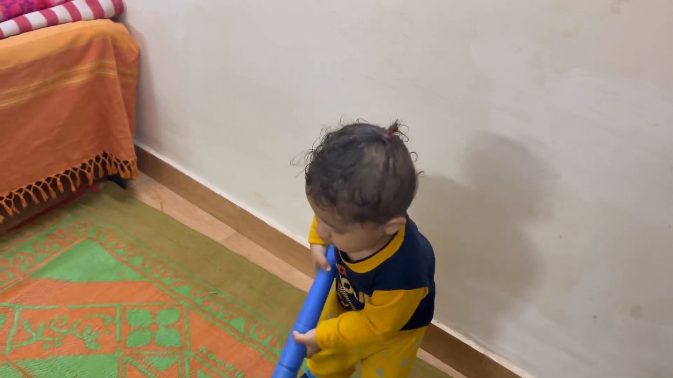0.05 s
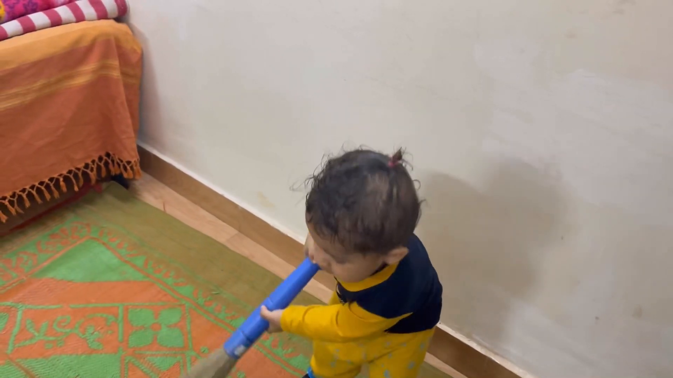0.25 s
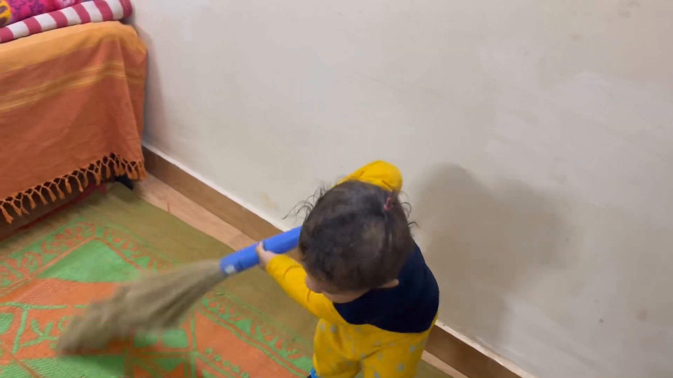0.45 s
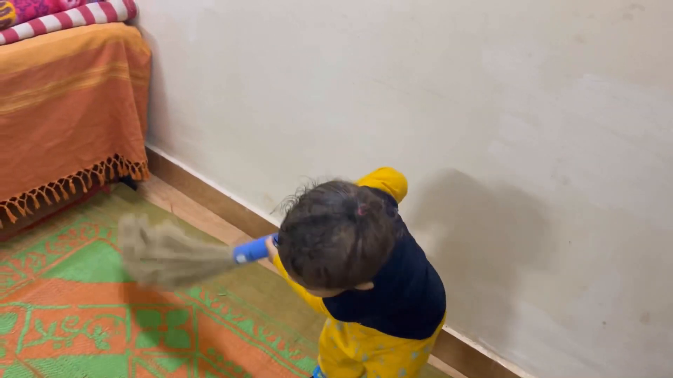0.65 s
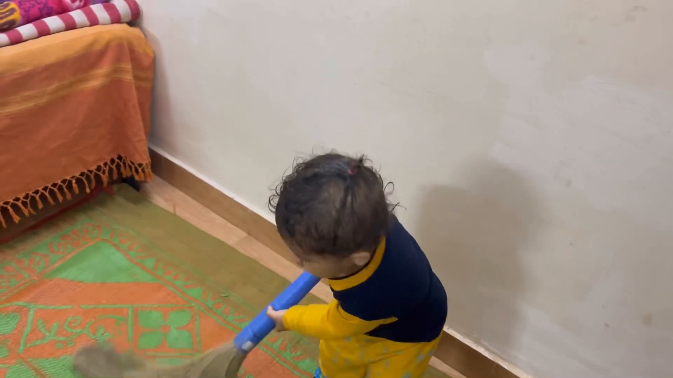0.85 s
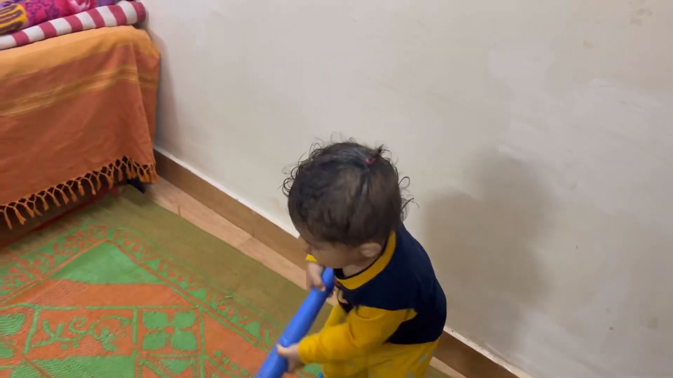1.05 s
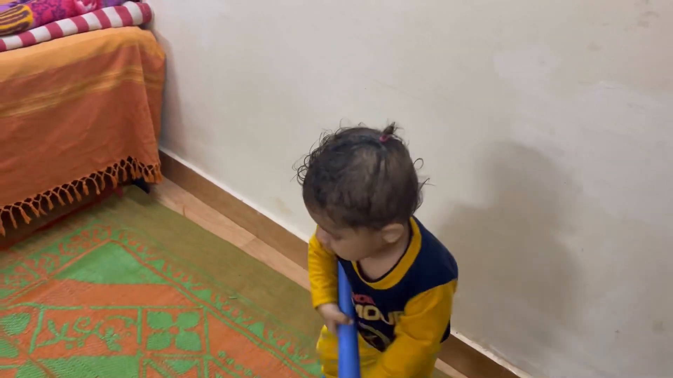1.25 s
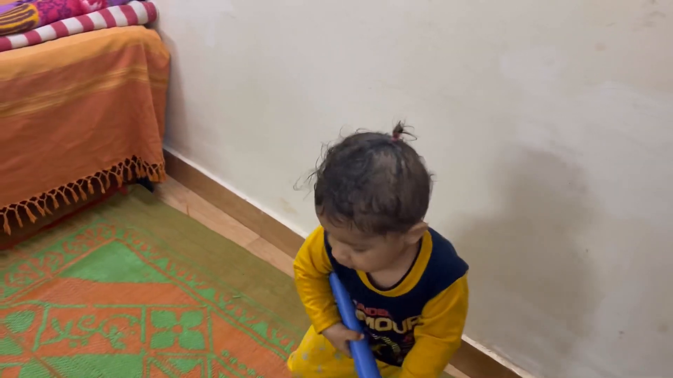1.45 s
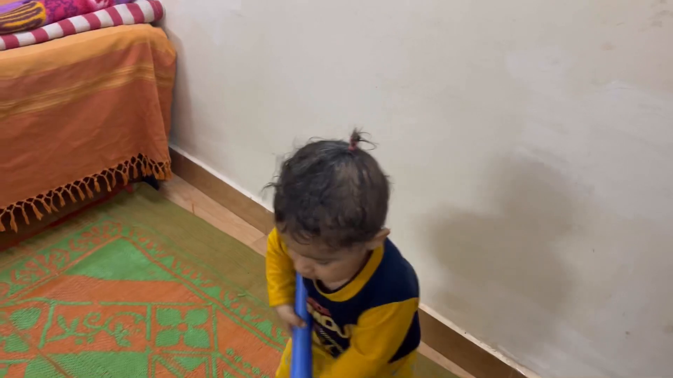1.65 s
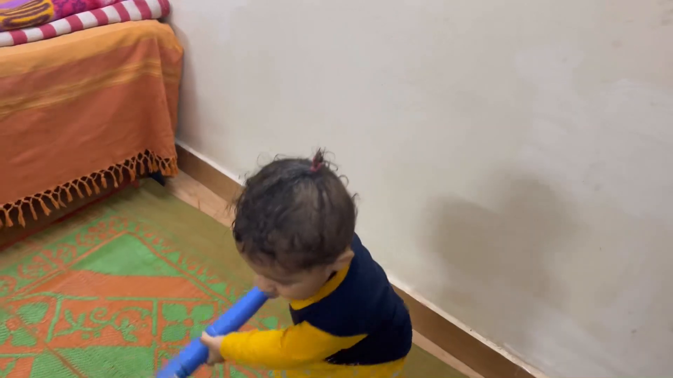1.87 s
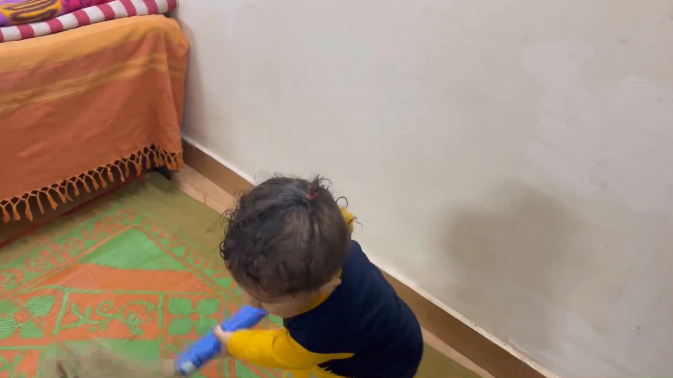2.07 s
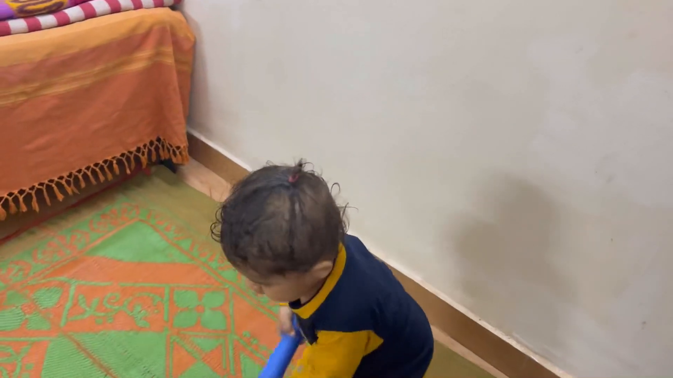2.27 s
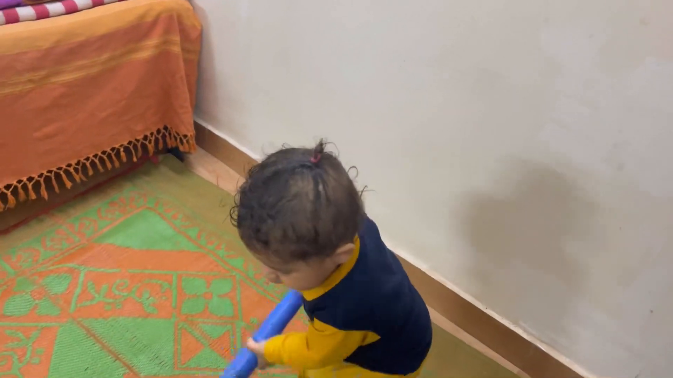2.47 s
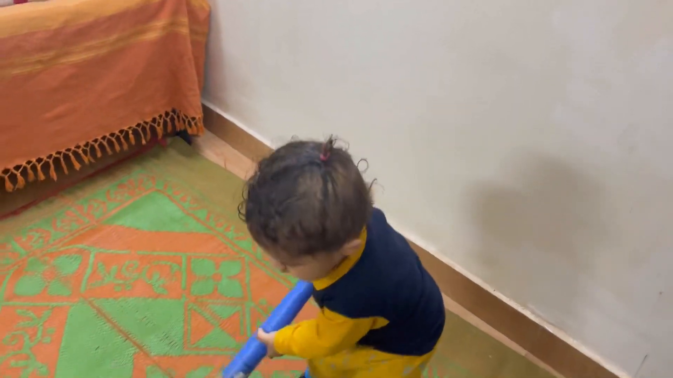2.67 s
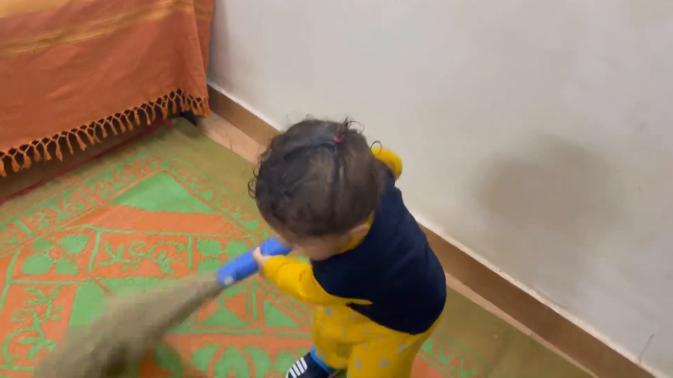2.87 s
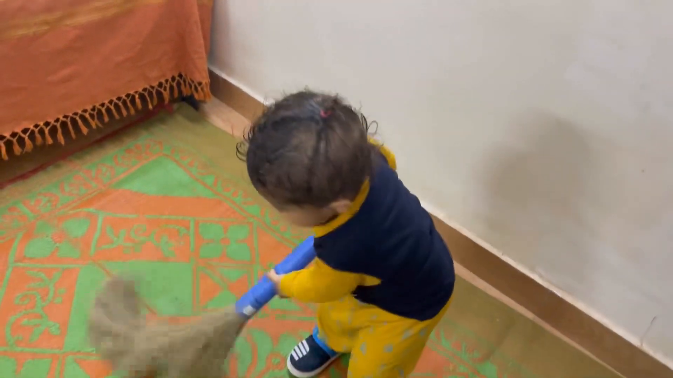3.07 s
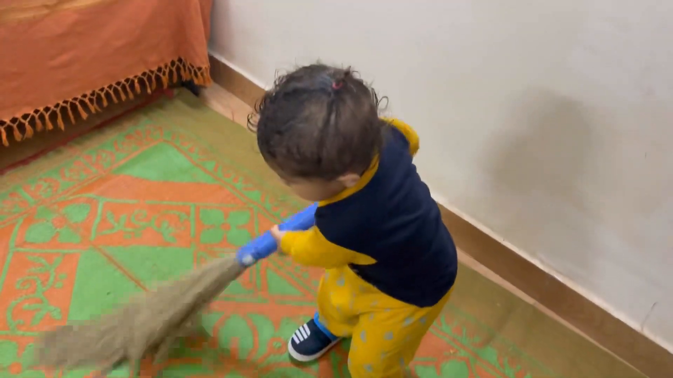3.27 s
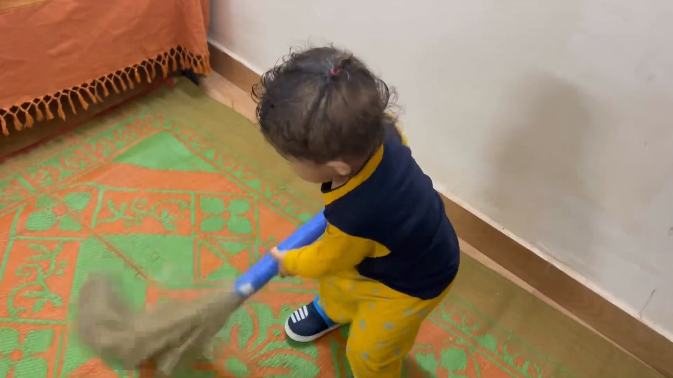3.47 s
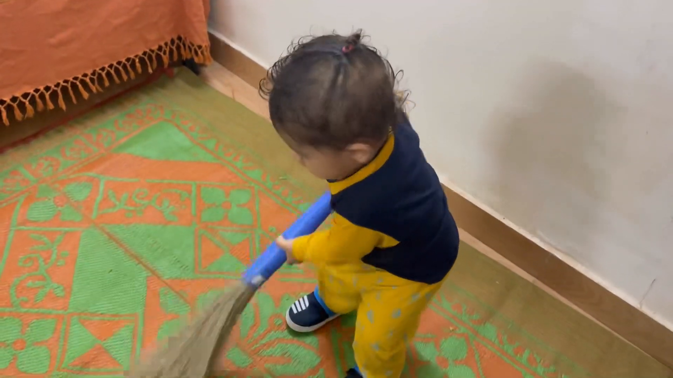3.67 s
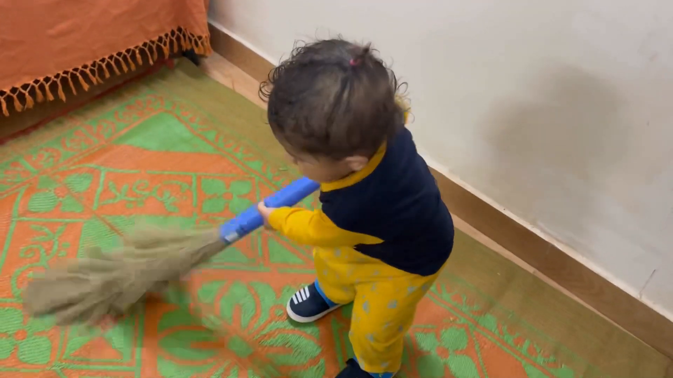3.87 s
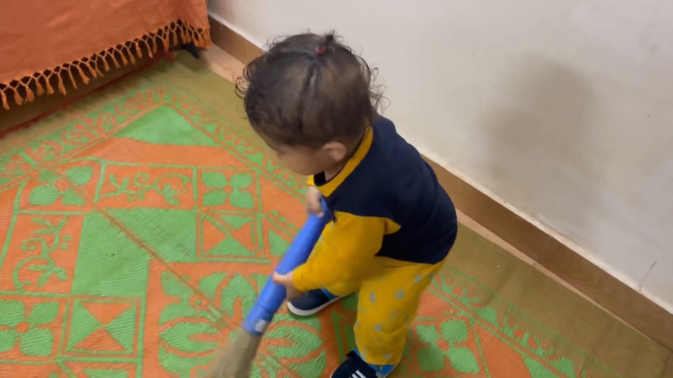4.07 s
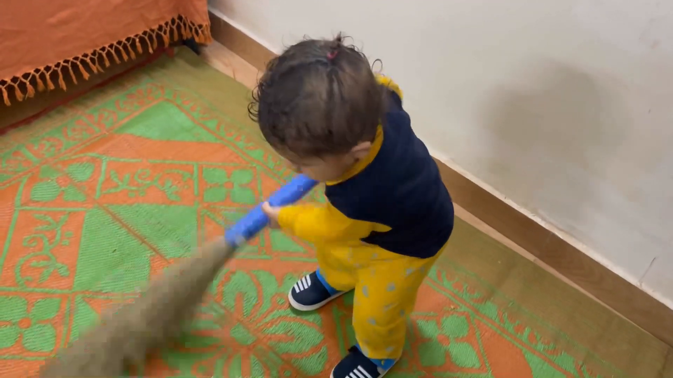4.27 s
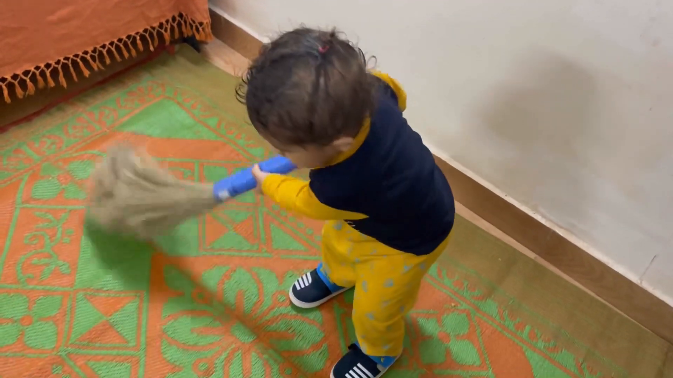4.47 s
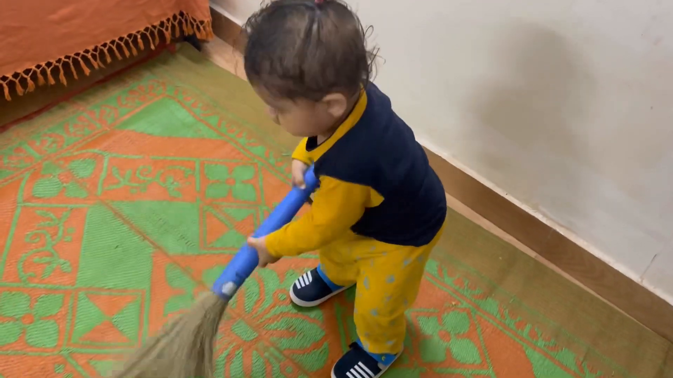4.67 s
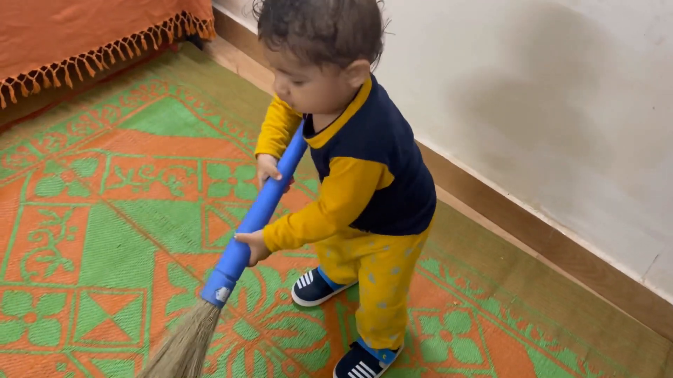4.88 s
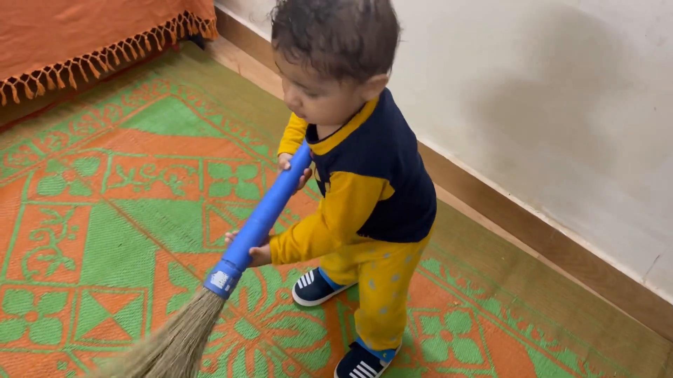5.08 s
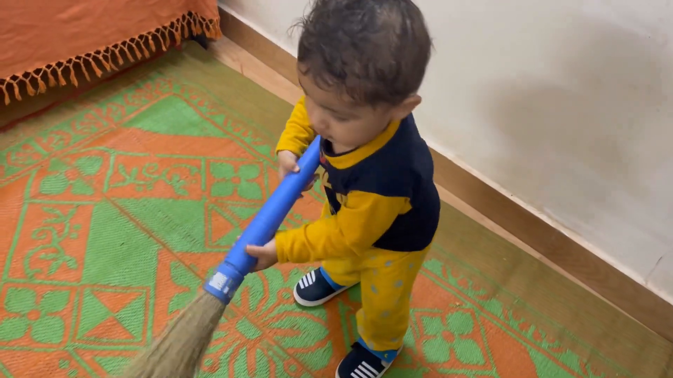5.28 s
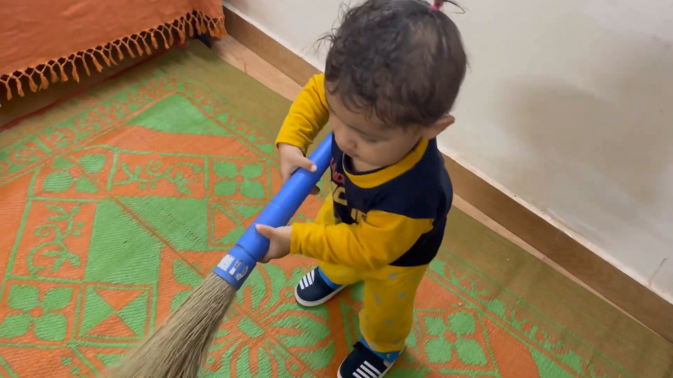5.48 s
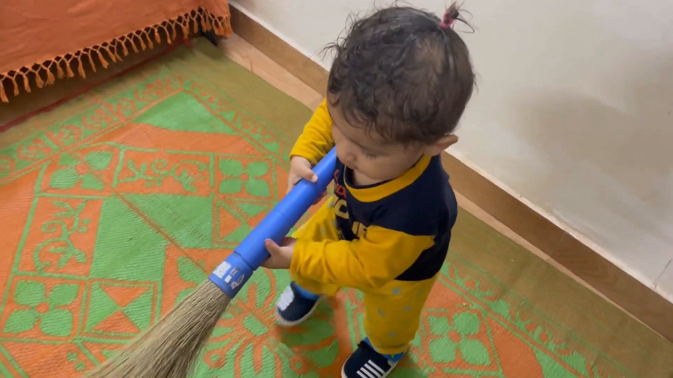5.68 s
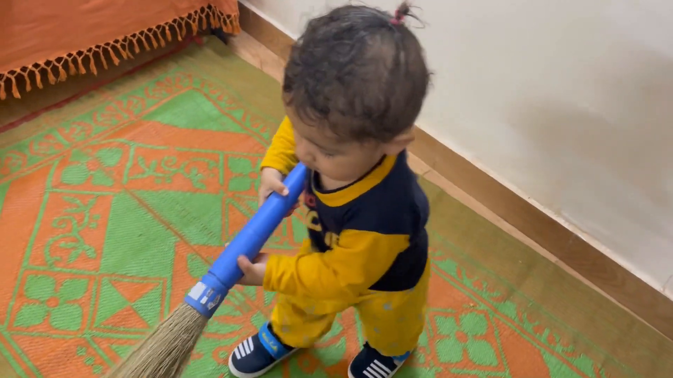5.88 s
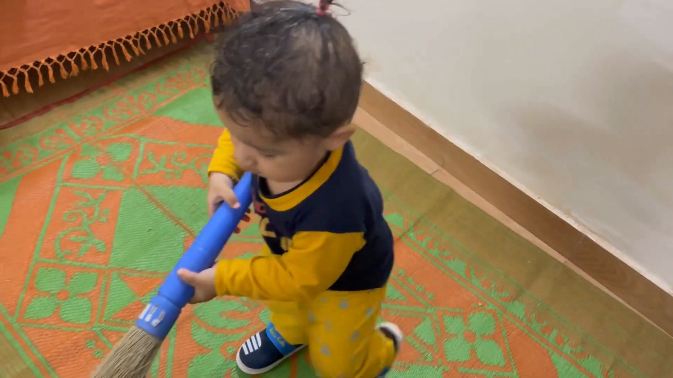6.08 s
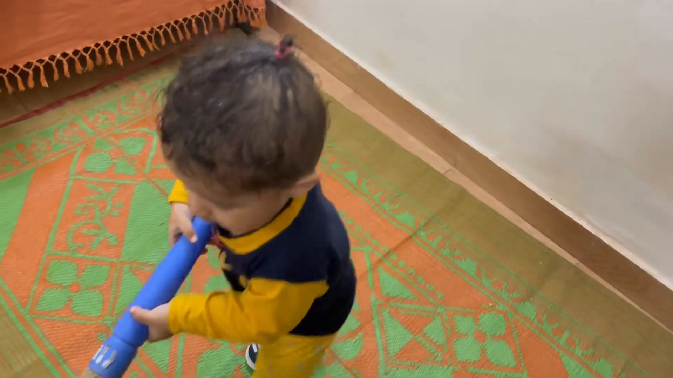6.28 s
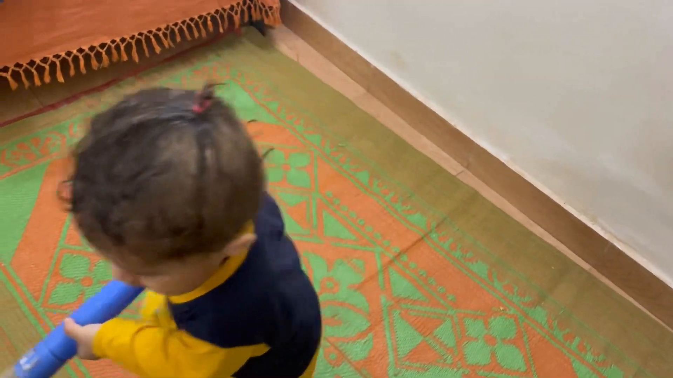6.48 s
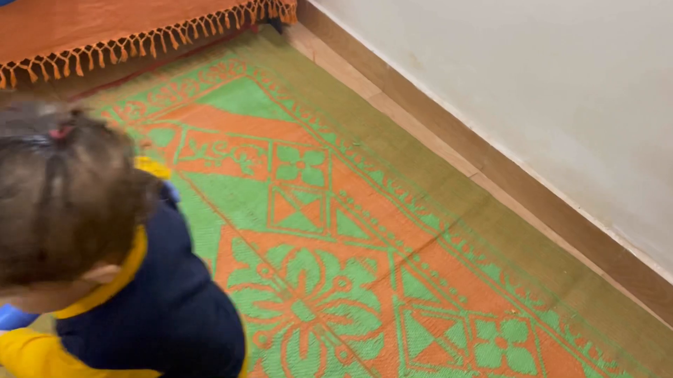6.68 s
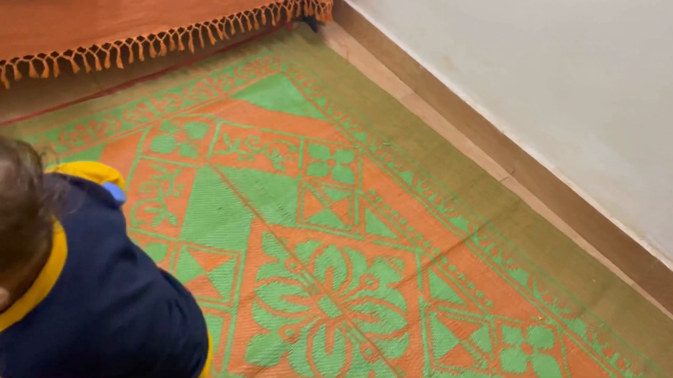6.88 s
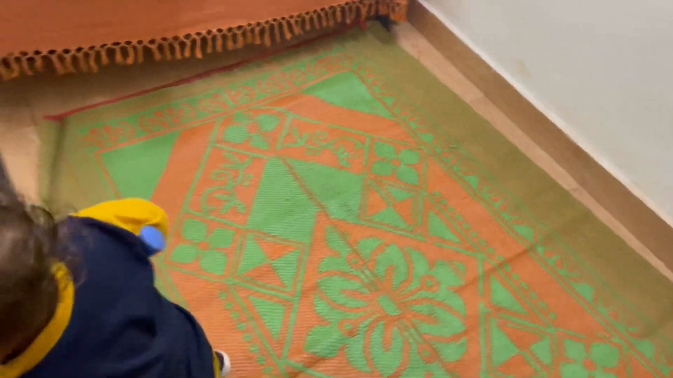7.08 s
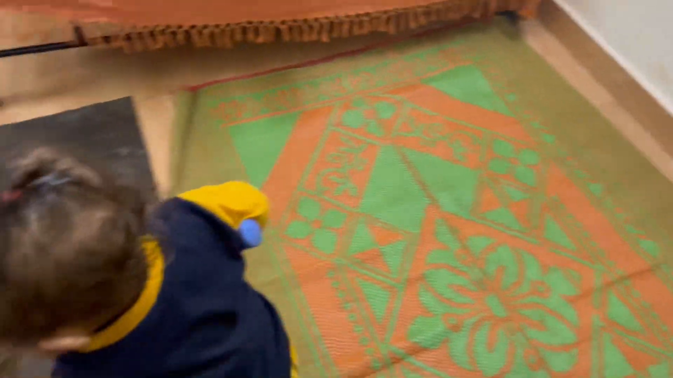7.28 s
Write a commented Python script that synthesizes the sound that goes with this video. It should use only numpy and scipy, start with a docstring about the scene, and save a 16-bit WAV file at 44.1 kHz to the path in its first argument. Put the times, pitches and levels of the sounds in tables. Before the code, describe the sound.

Quick, dry broom strokes brush a floor mat close by, giving way to a handle click and light shoe scuffs above a low throb.

```python
"""Quick swishes of a grass broom on a woven mat, close to a two-port microphone in a small room.
Each stroke speeds up, holds and eases off while countless fibre tips flick over the weave and stalks
tick. Then the broom only shifts lightly, its plastic handle clicks, and shoes scuff and bump on the mat,
with a faint, soft hiss before and between the scuffs.
Underneath, a low drone throbs through the walls, with room air, a faint motor hum and a thin far ring."""
import sys
import numpy as np
from scipy import signal
from scipy.fft import rfft, irfft, next_fast_len
from scipy.io import wavfile
from scipy.ndimage import uniform_filter1d, map_coordinates

SR = 44100
rng = np.random.default_rng(int(sys.argv[2]) if len(sys.argv) > 2 else 0)


def persist_wave(psi):
    """Save psi, clipped to +-1, as 16-bit WAV."""
    counts = np.round(np.clip(psi, -1, 1) * 32767).astype(np.int16)
    wavfile.write(sys.argv[1], SR, np.atleast_2d(counts).T)


N = 323694


def broom_and_hiss(clump_db=-1.0, flutter_db=0.5, low_drift_db=-1.1, level_db=2.0, low_db=-0.5, low_hz=4000):
    """Fibre tips flick over the weave in clumps; the same noise also makes two faint, soft hisses."""
    # tone colour of fibres on the weave: (frequency [Hz], level [dB])
    fibre_colour = [(300, -33), (1000, -25), (2000, -24), (3200, -19), (5200, -14), (6200, -11.5),
                    (6900, -11), (8200, -5), (10300, -2), (11200, -7.5), (12300, -17.5), (13200, -24),
                    (14500, -34.5), (15700, -24.5)]
    high_strength, low_strength = swish_strengths()
    tips = flicks(rate=22000, spread_db=-0.5) * amp(clump_db * wobble(260) + flutter_db * wobble(40))
    swish = patchy(coloured(tips, fibre_colour), depth_db=1.5)  # bending bundles shift their resonances
    # in a broom stroke, the thick stalks make the low part and the tips the high part
    low_swish = filtered(swish, lambda hz: 1 / (1 + (hz / low_hz) ** 4))
    low_part = low_strength * amp(low_db + low_drift_db * wobble(4.6)) * low_swish
    return at_ports(amp(level_db) * (high_strength * (swish - low_swish) + low_part))


def swish_strengths(touch_s=0.013, slap_db=-7, slap_s=0.018, rest_db=-91):
    """Strength of the high and low parts: every swish starts, rises, holds and eases off."""
    # broom strokes, except at 5.52 s and 6.26 s: a faint, soft hiss before and between the scuffs.
    # Onset is the starting strength, high when the broom drops from the air:
    # (start [s], rise [s], hold [s], level [dB], onset [0-1], extra low part [dB])
    swishes = [ (0.0, .02, 0.088, -43, 1, 0), (0.087, 0.16, 0.051, -29, 0.04, -4),
               (0.343, 0.039, 0.066, -39, 0.1, 0.5), (0.718, 0.037, 0.097, -32, 0.2, -1.5),
               (0.843, 0.082, 0.039, -33, 0.3, -10), (0.98, 0.15, 0.038, -30, 0.3, -6),
               (1.153, 0.083, 0.028, -26.5, 0, -9.5), (1.42, 0.046, .06, -51, 0.2, 7),
               (1.52, 0.099, 0.056, -33.5, 0, 4), (1.6, .14, 0.06, -24.5, 0, -4),
               (2.085, 0.15, 0.013, -26, 0.2, -1.5), (2.36, 0.14, 0.054, -24, 0, -2),
               (2.622, 0.043, 0.024, -32.5, 0, -2), (2.767, 0.094, 0.0072, -29, 0.24, -2),
               (3.003, 0.03, 0.115, -31, 0.5, -3), (3.217, 0.09, 0.043, -31, 0.18, -3.5),
               (3.406, 0.13, 0.021, -27.5, 0.12, -2.5), (3.632, 0.09, 0.067, -25, 0.03, -3),
               (3.82, 0.047, 0.038, -35.5, 0.1, 0), (3.93, 0.1, 0.022, -25, 0.1, -2.5),
               (4.067, 0.032, .04, -42, .1, 4.5), (4.14, 0.1, 0.034, -23, 0, -3.5),
               (4.509, 0.094, 0.06, -27, 0.6, -3), (4.8, 0.04, 0.06, -59.5, 0, 10),
               (4.93, 0.017, 0.018, -54.5, 0.5, 16.5), (5.253, 0.06, 0.046, -61.5, 0, 17),
               (5.52, 0.1, 0.038, -71.5, 0, 30), (5.82, 0.042, 0.054, -61, 0, 11),
               (5.98, 0.034, 0.027, -65, 0, -3), (6.26, 0.048, 0.16, -66, 0.1, 22),
               (6.542, .1, 0.13, -58.5, 0.6, -1), (6.815, 0.37, .25, -58.5, 0.35, 3), ]
    high_fade_db_per_s, low_fade_db_per_s = 126.5, 71  # the low part lasts longer
    lift_db_per_s2 = 228  # the high part fades ever faster, as when tips leave the mat
    high_power, low_power = np.full((2, N), amp(rest_db) ** 2)  # fibres stir even between strokes
    for start, rise, hold, db, onset, extra_low_db in swishes:
        t = np.maximum(np.arange(N) / SR - start, 0)
        touch = np.clip(t / touch_s, 0, 1)
        swell = touch * (onset + (1 - onset) * np.sin(np.pi / 2 * np.clip(t / rise, 0, 1)))
        slap = onset * touch * amp(db + slap_db) * np.exp(-t / slap_s)  # strong when the broom drops
        easing_s = np.maximum(t - rise - hold, 0)
        high_power += (swell * amp(db - high_fade_db_per_s * easing_s - lift_db_per_s2 * easing_s ** 2)) ** 2
        low_power += (swell * amp(db + extra_low_db - low_fade_db_per_s * easing_s)) ** 2 + slap ** 2
    return np.sqrt(high_power), np.sqrt(low_power)


def flicks(rate, spread_db):
    """Two streams of tiny clicks of uneven size, about rate a second in each."""
    hit = rng.random((2, N)) < rate / SR
    return unit(hit * rng.standard_normal((2, N)) * amp(spread_db * rng.standard_normal((2, N))))


def ticks(fade_s=0.024, octaves=1.3, rattle_db=-9):
    """A stiff stalk or a hard edge gives one dry snap and a brief rattle."""
    # stalk clicks and hard contacts: (time [s], level [dB], centre frequency [Hz])
    contacts = [(0.543, -28.5, 7500), (0.597, -36.5, 8000), (.691, -38, 7700), (1.573, -25.5, 2400),
                (1.642, -26, 2600), (1.686, -26, 2600), (1.939, -27, 4530), (2.669, -31, 7000),
                (2.684, -29.5, 1970), (2.697, -22, 3000), (4.882, -37, 7240), (6.003, -44, 4973),
                (6.289, -35, 4000), (6.655, -46, 2500), (7.006, -29, 1300)]
    # tone colour common to all ticks: (frequency [Hz], level [dB])
    tick_colour = [(300, -8), (1000, -3.5), (9000, 6), (11500, 6), (13500, -28), (16000, -23)]
    out, t = np.zeros((2, N)), np.arange(SR // 20) / SR
    for start, db, centre_hz in contacts:
        colour = lambda hz: amp(along(tick_colour, hz)) / (1 + (np.log2((hz + 1) / centre_hz) / octaves) ** 2)
        snap = filtered(signal.unit_impulse(len(t), SR // 2000) * np.array([[1], [0]]), colour)
        rattle = unit(filtered(rng.standard_normal((2, len(t))), colour)) * burst(t, 0.0001, fade_s)
        add(out, start, amp(db) * (1.5 * snap / np.abs(snap).max() + 0.88 * amp(rattle_db) * rattle))
    return paired(out, lambda hz: along([(1000, 0.91), (10000, 0.38)], hz), lead_s=1e-5)


def handle(snap_db=0.5, ring_db=-20, snap_hz=3400, octaves=1.13):
    """A thin snap sets the hollow plastic handle ringing for a moment."""
    # the handle clicks in the hands and settles: (time [s], level [dB])
    clicks = [(4.9484, -21), (4.9508, -32)]
    # the notes it rings with: (frequency [Hz], level [dB], fade time [s])
    notes = [(1238, -1, 0.02), (2290, 8, 0.016), (2840, 6, 0.012), (3930, 11, 0.011), (5250, -3, 0.012),
             (5850, -5, 0.011), (7630, 0, 0.012), (8960, -1, 0.013)]
    out, t = np.zeros((2, N)), np.arange(SR // 10) / SR
    colour = lambda hz: 1 / (1 + (np.log2((hz + 1) / snap_hz) / octaves) ** 4)
    snap = filtered(signal.unit_impulse(len(t), 8), colour)
    for start, db in clicks:
        ring = 0
        for hz, note_db, fade_s in notes:
            strength = amp(note_db + rng.normal(0, 2, (2, 1)))
            ring += strength * np.sin(2 * np.pi * hz * t) * burst(t, 0.0001, fade_s)
        add(out, start, amp(db) * (amp(snap_db) * snap / np.abs(snap).max() + amp(ring_db) * ring))
    return out


def scuffs(level_db=-4, rub_db=-6, rise_s=0.0019, fade_s=0.15):
    """A sole grazes the mat: a gritty hiss over a duller rub."""
    # shoe scuffs: (time [s], level [dB], extra rub [dB])
    grazes = [(5.81, -39.5, -9), (5.856, -37, -7), (6.065, -51, -6), (6.258, -41.5, -5), (6.287, -39, -2),
              (6.405, -46.5, -4), (6.616, -35, -13), (6.651, -33.5, -7), (6.9894, -31, 2.5),
              (7.324, -41.5, 10.5)]
    # tone colours of the grit and the rub: (frequency [Hz], level [dB])
    grit_colour = [(500, -21), (2000, -7), (4500, 0.5), (6500, -0.5), (8500, 7.5), (11000, 6), (13000, -23),
                   (16000, -37)]
    rub_colour = [(80, -14), (250, -14), (700, -4.5), (2000, -5), (6000, -25)]
    out, t = np.zeros((2, N)), np.arange(SR // 3) / SR
    for start, db, extra_db in grazes:
        grit = coloured(rng.laplace(size=(2, len(t))), grit_colour)
        rub = amp(rub_db + extra_db) * coloured(rng.standard_normal((2, len(t))), rub_colour)
        add(out, start, amp(db + level_db) * (grit + rub) * burst(t, rise_s, fade_s))
    return at_ports(out)


def bumps(puff_db=-8.0, ring_db=-12, rise_s=0.001):
    """A padded blow on the hard floor: a puff and a few short notes, muffled by the padding."""
    # soft bumps: (time [s], level [dB], puff fade time [s], muffled above [Hz], pitch [ratio])
    blows = [(1.571, -30, 0.058, 1300, 1.19), (1.576, -36, 0.059, 900, 0.84), (1.594, -35, 0.06, 600, 0.95),
             (6.653, -34.5, 0.099, 1300, 0.82), (6.99, -37, 0.05, 798, 0.8), (7.002, -27, 0.13, 1600, 0.99),
             (7.037, -33.5, 0.17, 2400, 0.91)]
    # tone colour of the puff at pitch 1: (frequency [Hz], level [dB])
    puff_colour = [(80, -29), (200, 6), (310, 14.5), (450, 2), (650, 8), (1000, -1.5), (2200, 1),
                   (6000, -12), (16000, -24)]
    # a bump's short ring at pitch 1: (frequency [Hz], level [dB], fade time [s])
    notes = [(230, 6, 0.059), (309, 8.5, 0.096), (505, 9, 0.055), (670, -3, 0.038), (906, -6, 0.15),
             (1347, 0, 0.089)]
    puffs, rings, t = np.zeros((2, N)), np.zeros((2, N)), np.arange(SR // 2) / SR
    for start, db, puff_s, top_hz, pitch in blows:
        padding = lambda hz: 1 / np.sqrt(1 + (hz / top_hz) ** 2)
        colour = lambda hz: padding(hz) * amp(along(puff_colour, hz / pitch))
        puff = unit(filtered(rng.standard_normal((2, len(t))), colour))
        add(puffs, start, amp(db + puff_db) * puff * burst(t, rise_s, puff_s))
        for hz, note_db, fade_s in notes:
            note = padding(hz) * np.sin(2 * np.pi * pitch * hz * t) * burst(t, rise_s, fade_s)
            add(rings, start, amp(db + ring_db + note_db + rng.normal(0, 0.84)) * note[None])
    return rings + paired(puffs, lambda hz: along([(300, 1.0), (2000, 0.49)], hz), lead_s=2e-5)


def drone(level_db=-4.0, rumble_db=-12, sway_db=-0.1, beat_hz=7):
    """Two close low tones throb against each other over a rumble, heard through the walls."""
    # the drone's swells: (time [s], level [dB])
    swells = [(0, -39.5), (0.08, -30.5), (0.17, -32.5), (0.33, -41.5), (0.51, -30.5), (0.61, -40),
              (0.73, -30.5), (0.98, -40), (1.27, -44), (1.5, -38), (1.68, -29), (1.75, -39.5), (2.02, -24),
              (2.21, -36), (2.41, -26), (2.72, -35), (2.82, -38.5), (3.12, -33), (3.22, -58), (3.35, -33),
              (3.47, -43), (3.75, -33), (3.98, -37.5), (4.1, -30), (4.22, -39), (4.55, -34.5),
              (4.98, -34.5), (5.06, -41), (5.25, -35), (5.33, -46), (5.54, -31), (5.7, -40.5), (6.3, -40.5),
              (6.54, -36), (6.71, -35), (6.79, -45), (6.92, -39), (7.22, -43.5), (7.34, -31)]
    # its main tone: (time [s], pitch [Hz])
    pitches = [(0, 47.6), (4.4, 48.2), (5.5, 50.8), (7.34, 50.5)]
    # its lower tone: (time [s], strength against the main tone [0-1])
    lower_share = [(0, 0.37), (3.6, 0.096), (4.2, 1), (7.34, 0.3)]
    rumble_colour = [(25, -56), (36, -18), (43, 17), (55, 22), (66, -22), (90, -38), (200, -54), (500, -120)]
    rumble = amp(rumble_db) * coloured(rng.standard_normal(N), rumble_colour)
    swell = amp(curves(swells)[0] + level_db + sway_db * wobble(28))
    pitch_hz = curves(pitches)[0] + 1.503 * wobble(9.8)
    lower_tone = curves(lower_share)[0] * tone(pitch_hz - beat_hz + 3 * wobble(4))
    throb = swell * (tone(pitch_hz) + lower_tone + rumble)
    return filtered(throb, lambda hz: 1 - 1 / (1 + (hz / 36) ** 10))  # the microphone drops the lowest bass


def room_air(low_cut_hz=58):
    """Still room air: a soft, dull rush whose level drifts slowly."""
    # its tone colour: (frequency [Hz], level [dB])
    colour = [(60, -5), (82, -13.5), (105, -19), (150, -21.5), (230, -20), (414, -26), (600, -27),
              (1100, -31.5), (1700, -35.5), (2900, -38.5), (4300, -45.5), (5500, -49.5), (9600, -48.5),
              (15000, -148)]
    # how alike it is on the left and right: (frequency [Hz], likeness [0-1])
    likeness = [(60, 0.83), (170, 0.75), (350, 0.7), (700, 0.11), (2000, 0.096), (8000, 0.61)]
    # its drift: (time [s], level [dB])
    drift = [(0, -47.5), (2, -46.5), (4, -47.5), (6.5, -45), (7.34, -46)]
    rush = coloured(rng.standard_normal((2, N)), colour)
    rush = filtered(rush, lambda hz: 1 - 1 / (1 + (hz / low_cut_hz) ** 8))
    return amp(curves(drift)[0]) * unit(paired(rush, lambda hz: along(likeness, hz), lead_s=4e-5))


def motor_hum():
    """A far motor hums on one unsteady note."""
    # the hum: (time [s], level [dB], pitch [Hz])
    course = [(0, -66.5, 181.8), (5.6, -62, 172.3), (5.95, -51.5, 175), (6.22, -57.5, 178.8),
              (6.48, -46.5, 182), (6.68, -54, 185.6), (6.85, -66, 191)]
    db, hz = curves(course)
    return amp(db + 1.4 * wobble(18)) * tone(hz + 4 * wobble(30))


def far_ring(pitch_hz=1396):
    """A thin far ring comes by many paths, so each port hears it waver in its own way."""
    # the ring's swells: (time [s], level [dB])
    swells = [(2.7, -70), (3.4, -63), (4.4, -64), (5.04, -59.5), (5.1, -51), (5.17, -58), (5.8, -63.5),
              (7.34, -68)]
    swell = amp(curves(swells)[0] + 1.4 * wobble(18))
    return swell * np.array([tone(pitch_hz + 30 * wobble(160)) for _ in range(2)])


def room(x):
    """Bare walls answer with a short echo, the highest treble dying first."""
    # how long the echo lasts: (frequency [Hz], time to fade by 60 dB [s])
    fade_times = [(150, 0.52), (1000, 0.52), (4000, 0.66), (9000, 0.039), (15000, 0.031)]
    hz, t, bands = signal.stft(rng.standard_normal((2, SR // 2)), SR, nperseg=256)
    tail = signal.istft(bands * amp(-60 * t / along(fade_times, hz)[:, None]), SR, nperseg=256)[1]
    tail = np.pad(tail / np.linalg.norm(tail[0]), ((0, 0), (SR // 200, 0)))  # starts 5 ms late
    return signal.fftconvolve(x, tail, axes=1)[:, :N]


def at_ports(x):
    """Sound reaches the microphone's two openings with different timing and level."""
    # left against right: (frequency [Hz], left lead [rad], left louder by [dB], likeness [0-1])
    ports = [(1500, -0.62, 1.3, 0.21), (2600, 1.65, 2.9, 0.23), (3700, 0.22, 2.9, 0.59),
             (5500, 0.52, 4.4, 0.62), (6800, -0.01, 4.1, 0.71), (7400, 1.14, 3.8, 0.81),
             (8700, -0.12, 0.4, 0.96), (9400, -1.74, 0.3, 0.87), (10230, -3.14, -0.0, 1.0),
             (11000, -4.4, 0.2, 0.84), (11800, -6.28, -0.1, 1.0), (12800, -6.45, 0.3, 0.65),
             (13900, -9.43, -0.1, 0.74), (14800, -12.55, 0.1, 0.94)]
    half = lambda hz: np.exp(0.5j * along(ports, hz, column=1)) * amp(along(ports, hz, column=2) / 2)
    pair = paired(x, lambda hz: along(ports, hz, column=3))
    return filtered(pair, lambda hz: np.array([half(hz), 1 / half(hz)]))


def paired(x, likeness, lead_s=0):
    """Mix two signals into left and right, with a likeness per frequency; the left comes lead_s early."""
    turn = lambda hz: np.arccos(np.clip(likeness(hz), 0, 1)) / 2
    mid, side = filtered(x, lambda hz: np.array([np.cos(turn(hz)), np.sin(turn(hz))]))
    pair = np.array([mid + side, mid - side])
    return filtered(pair, lambda hz: np.exp(1j * np.pi * lead_s * np.array([hz, -hz])))


def patchy(x, depth_db):
    """Shift the tone colour in patches some hundred Hz wide and some tens of ms long."""
    bands = signal.stft(x, nperseg=512)[2]
    patches = uniform_filter1d(rng.standard_normal(bands.shape[1:]), size=6, axis=0)
    patches = uniform_filter1d(patches, size=12, axis=1)
    return unit(signal.istft(bands * amp(depth_db * unit(patches)), nperseg=512)[1][:, :N])


def amp(db):
    """Turn decibels into a factor."""
    return 10 ** (np.asarray(db) / 20)


def unit(x):
    """Scale to an average strength (rms) of 1."""
    return x / np.sqrt(np.mean(x ** 2) + 1e-20)


def along(points, hz, column=1):
    """Read a table between its frequencies, on a log scale."""
    columns = np.transpose(points)
    return np.interp(np.log(hz + 1), np.log(columns[0] + 1), columns[column])


def curves(rows):
    """One value per sample for each column after the time."""
    times, *columns = np.transpose(rows)
    return [np.interp(np.arange(N) / SR, times, column) for column in columns]


def wobble(rate):
    """A smooth curve through rate random points a second."""
    points = rng.standard_normal(int(N * rate / SR) + 4)
    return unit(map_coordinates(points, [np.arange(N) * rate / SR]))


def filtered(x, response):
    """Scale and shift each frequency of x by response(hz)."""
    n = x.shape[-1]
    padded = next_fast_len(n + 8192)
    return irfft(rfft(x, padded) * response(np.fft.rfftfreq(padded, 1 / SR)), padded)[..., :n]


def coloured(x, colour):
    """Give x a tone colour of (frequency [Hz], level [dB]) points, at strength 1."""
    return unit(filtered(x, lambda hz: amp(along(colour, hz))))


def add(track, start_s, sound):
    """Mix a sound into a track."""
    part = track[:, max(round(start_s * SR), 0):][:, :sound.shape[-1]]
    part += sound[:, :part.shape[-1]]


def burst(t, rise_s, fade_s):
    """A quick rise, and a fall of 60 dB in fade_s."""
    return (1 - np.exp(-t / rise_s)) * np.exp(-np.log(1000) * t / fade_s)


def tone(pitch_hz):
    """A pure tone of strength 1 on a moving pitch."""
    return np.sqrt(2) * np.sin(2 * np.pi * np.cumsum(pitch_hz * np.ones(N)) / SR)


def scene(swish_room_db=-21, step_room_db=-7, tick_room_db=-11):
    """The near swishes have almost no echo, the clicks a little; steps wake the room most."""
    swishes, clicks, steps = broom_and_hiss(), ticks() + handle(), scuffs() + bumps()
    echo = room(amp(swish_room_db) * swishes + amp(tick_room_db) * clicks + amp(step_room_db) * steps)
    background = (drone() + room_air() + motor_hum() + far_ring()) * amp([[-0.35], [0.35]])  # leans right
    return swishes + clicks + steps + echo + background


def record(dry, top_hz=15850):
    """The recorder keeps nothing above top_hz."""
    return filtered(dry, lambda hz: hz < top_hz)


dry = scene()
out = record(dry)
persist_wave(out)
```